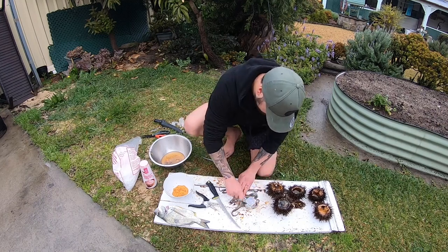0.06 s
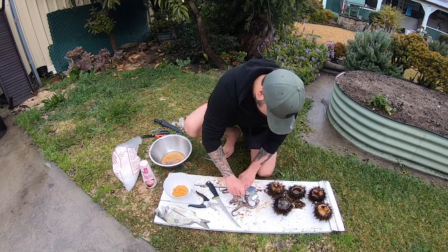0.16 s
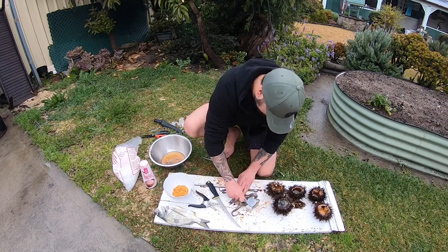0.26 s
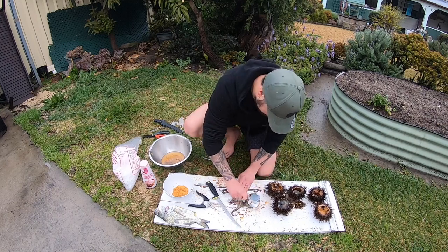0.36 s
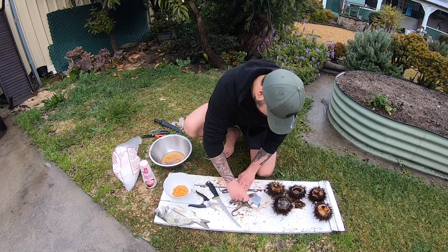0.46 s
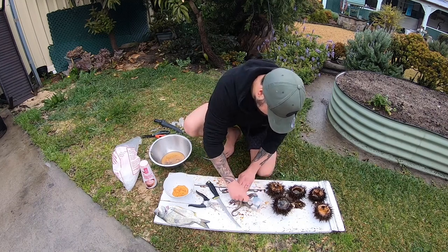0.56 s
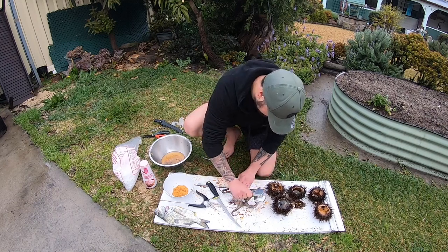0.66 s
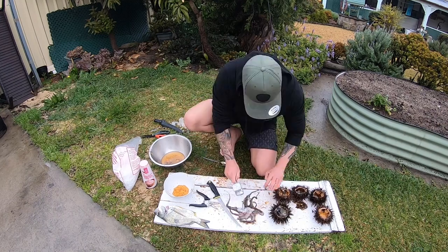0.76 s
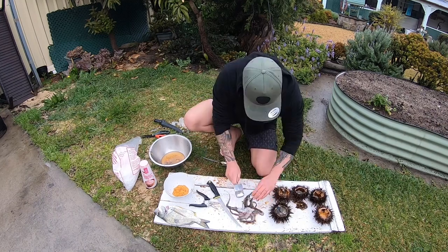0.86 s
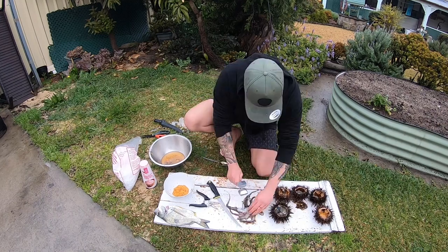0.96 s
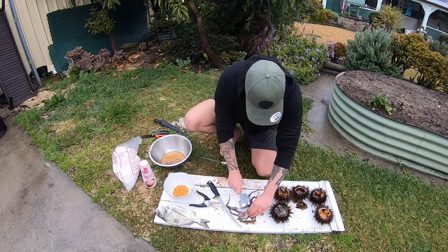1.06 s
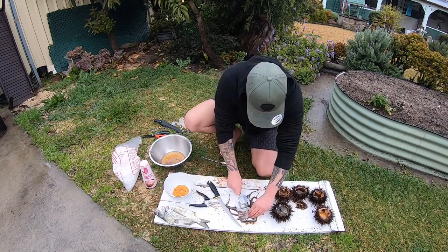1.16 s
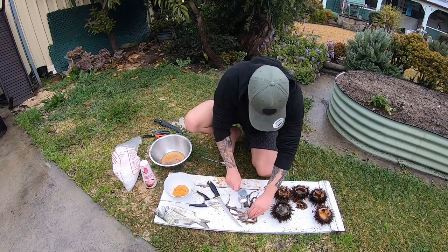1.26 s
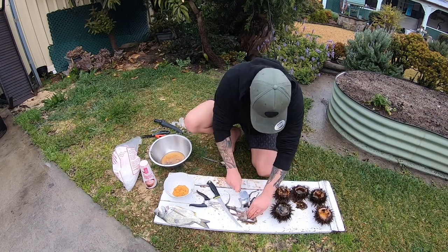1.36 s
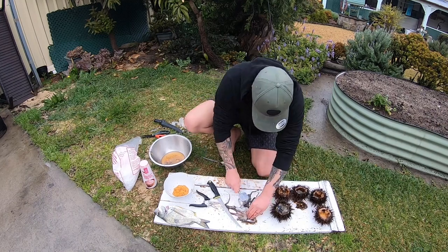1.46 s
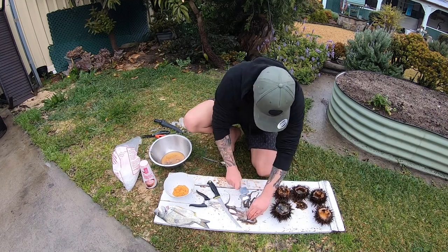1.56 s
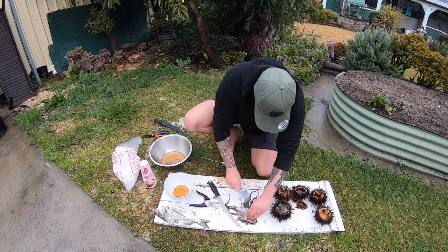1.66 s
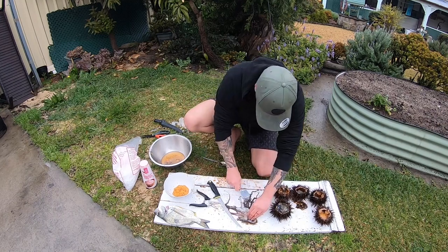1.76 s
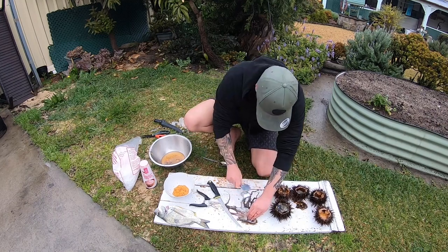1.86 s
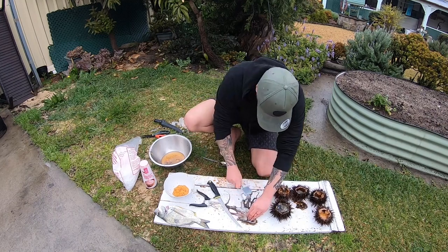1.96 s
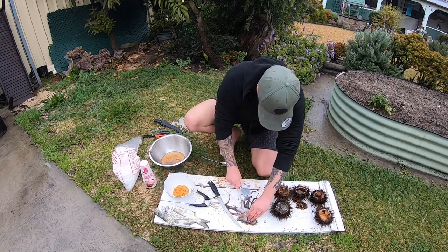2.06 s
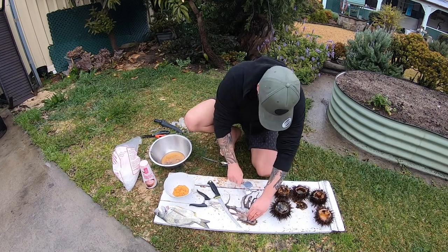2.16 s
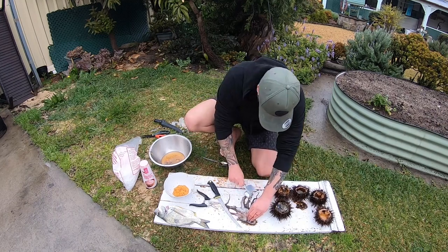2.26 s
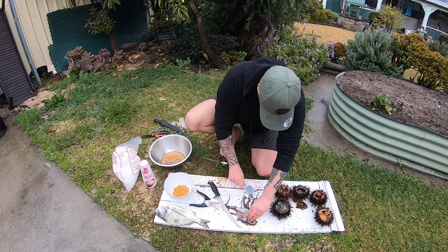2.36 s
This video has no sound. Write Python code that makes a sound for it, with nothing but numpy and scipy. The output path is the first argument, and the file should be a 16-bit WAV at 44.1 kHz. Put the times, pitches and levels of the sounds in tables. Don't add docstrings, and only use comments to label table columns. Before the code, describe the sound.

Seven heavy wet whacks on octopus over a rattling board on grass, faint traffic behind

```python
import sys
import numpy as np
from scipy import signal
from scipy.fft import rfft, irfft
from scipy.io import wavfile
from scipy.ndimage import uniform_filter1d

SR = 44100
rng = np.random.default_rng(int(sys.argv[2]) if len(sys.argv) > 2 else 0)


def to_wav(s):
    ch = np.atleast_2d(s).T
    pcm = np.round(np.clip(ch, -1, 1) * 32767)
    wavfile.write(sys.argv[1], SR, pcm.astype(np.int16))


def decibels_to_gain(level_db):
    exponent = np.asarray(level_db, float) / 20
    return 10 ** exponent


N = 105840

# start_s, level_db, pitch_hz, pitch_fall_per_s
BLOWS = [
    (0.1256, -3, 344, 40.6),
    (0.3736, -3.5, 370, 61.7),
    (0.617, -4.5, 373, 110),
    (1.2159, -7.5, 302, 120),
    (1.5215, -4, 331, 69),
    (1.8121, -3.5, 371, 40),
    (2.1143, -4.5, 551, 509),
]
# start_s, level_db, pitch_hz, sharpness_db
REBOUNDS = [(.128, -11, 432, -10.5), (0.135, -19.5, 568, 11), (0.141, -10.5, 324, -3.5),
            (0.383, -14.5, 430, 5.5), (.394, -16.5, 406, -7), (0.619, -15, 414, 4), (.627, -14, 404, 2),
            (0.636, -19.5, 400, -7.5), (1.211, -49, 700, 0), (1.218, -7, 763, -21), (1.222, -12, 392, 3),
            (1.227, -10, 353, -18.5), (1.524, -16, 324, 6), (1.5305, -15, 500, 9), (1.539, -16.5, 308, 0),
            (1.814, -15, 442, 1.5), (1.821, -8.5, 406, 0.5), (1.833, -20, 354, -6), (2.1192, -22, 432, 9),
            (2.1246, -9.5, 367, -21), (2.136, -21, 384, -4)]
# start_s, level_db, pitch_hz, sharpness_db
RATTLES = [(0.113, -31, 400, -17), (.170, -25, 507, 8), (0.213, -25, 390, -2), (0.4201, -24, 593, -1.5),
           (.6655, -25.5, 595, 0), (0.673, -24.5, 580, -11), (0.721, -26.5, 610, -15), (0.8, -28, 404, -20),
           (0.818, -26.5, 374, 1), (0.8466, -26.5, 343, -24), (0.989, -33.5, 345, -5.5),
           (1.259, -20.5, 362, -14), (1.264, -22.5, 447, -10), (1.282, -21, 370, -29),
           (1.31, -23.5, 397, -21), (1.555, -29, 400, -14), (1.584, -24, 400, -14), (1.860, -24, 390, -7),
           (1.878, -23.5, 442, -3.5), (1.907, -19.5, 450, -2.5), (2.1015, -23, 755, -16),
           (2.158, -25, 450, -5), (2.384, -34, 750, -31), (2.396, -23.5, 725, -28), (.2, -26, 500, 0.5),
           (.429, -31, 600, -5), (.449, -26.5, 361, -13), (.474, -30.5, 415, -3), (.579, -42, 225, -18),
           (.727, -29, 590, -8), (.807, -33.5, 334, -12), (1.24, -22, 398, -3), (1.297, -23.5, 354, -14),
           (1.51, -34, 400, -17), (1.567, -27.5, 517, 0), (1.603, -28, 450, -6), (1.628, -32, 363, -16),
           (1.798, -30, 500, -12.5), (1.93, -31, 342, -15), (2.204, -38, 447, -9), (2.256, -34.5, 400, -10)]
# pitch_hz, level_db, t60_s
BOARD_MODES = [(210, -13.5, 0.09), (799, -8, 0.039), (1134, -11, 0.02), (1406, -7.5, 0.017),
               (1843, -16.5, 0.031), (2210, -16.5, 0.01), (2810, -7, 0.0052), (3660, -22, 0.021)]
# start_s, level_db
BOWL_HITS = [
    (.374, -48.5),
    (.617, -44.5),
    (1.216, -60),
    (1.812, -41.5),
    (2.114, -64),
]
# start_s, level_db, pitch_hz, t60_s
CLINKS = [(0.1253, -22.5, 2570, 0.022), (0.136, -20, 1630, 0.022), (.372, -35, 4220, 0.022),
          (0.376, -35.5, 2420, 0.013), (0.385, -27, 1620, 0.026), (0.4203, -25.5, 1590, 0.028),
          (0.6663, -33, 1160, 0.026), (1.2105, -28.5, 2145, 0.037), (1.213, -31.5, 3260, .02),
          (1.222, -28, 2600, 0.013), (1.288, -46, 3360, .03), (1.5176, -22.5, 2090, 0.023),
          (1.527, -31, 3010, .04), (1.529, -19, 1545, 0.015), (1.822, -18.5, 1480, 0.028),
          (1.882, -38.5, 3350, 0.016), (1.882, -47.5, 5300, 0.017), (.6145, -34, 6200, 0.015),
          (.6142, -13.5, 804, 0.058)]
# pitch_hz, slap_db, tail_db, tail_t60_s
SLAP_BANDS = [(700, -27.5, -32.5, 0.32), (1280, -36, -40.5, 0.32), (2410, -34.5, -46, 0.31),
              (3650, -42, -64, 0.17), (6320, -46.5, -57, 0.35), (8300, -64.5, -58.5, 0.13),
              (10500, -65, -82, .2), (12200, -57.5, -75, .2), (14000, -55, -74, .2)]
# start_s, level_db, brightness_db_per_octave
TAPS = [(0.1208, 0.5, 0), (0.3701, -0.5, 0.5), (0.6133, -3.5, 0), (1.209, 0, 1.5), (1.5164, -0.5, 2),
        (1.8075, -7, 2), (2.1104, -4, 1), (0.135, -21, -4), (0.419, -24, -3), (0.7976, -18, 0.5),
        (0.808, -33, 4.5), (0.8565, -27, 4), (1.219, -13, -1), (1.287, -29.5, 4), (1.526, -10.5, 0),
        (1.8112, -2, -1), (1.8816, -25, 1.5), (2.398, -24, 6), (.17, -37, -6), (.666, -38, -1.5),
        (1.552, -36, 13.5), (1.568, -30, -5), (2.117, -15, 2.5), (.97, -49, 8)]
# pitch_hz, level_db_per_hz
TRAFFIC_COLOUR = [(35, -15), (60, 3.5), (150, 2), (400, -4.5), (1000, -4.5), (1700, -13.5), (3500, -27.5),
                  (4400, -54), (9000, -36), (11000, -67.5)]
# start_s, level_db
TRAFFIC_SWELL = [(0, -47), (.5, -49.5), (1, -46.5), (1.5, -46.5), (2, -48), (2.4, -49.5)]
# pitch_hz, likeness_0_to_1
LIKENESS = [(60, 0.9), (120, 0.9), (250, 1), (520, 0.54), (1080, 0.29), (2220, 0.13), (4560, 0.52),
            (9390, 0.15)]
# start_s, level_db
ENGINE_LEVEL = [(0, -52), (.4, -49.5), (.62, -62), (.8, -57), (1, -65), (1.1, -63.5), (2.4, -89)]
# start_s, level_db
TYRE_LEVEL = [(.7, -71), (.9, -50.5), (1.2, -53.5), (1.35, -58), (1.5, -56.5), (1.9, -65), (2.4, -64)]
# start_s, level_db
WIND_GUSTS = [(0, -45), (.08, -40), (.14, -37), (0.221, -33), (0.299, -55.5), (.45, -54), (.58, -39),
              (.68, -56.5), (.93, -65.5), (.985, -40.5), (1.079, -56), (1.301, -52), (1.42, -77),
              (1.6, -56.5), (1.85, -55.5), (2.4, -61)]
# start_s, length_s, level_db, start_hz, end_hz
BIRD_NOTES = [(0.053, 0.1, -77, 6700, 6600), (0.862, 0.055, -73, 6750, 6560), (1.016, .05, -76, 6650, 6650),
              (1.162, 0.055, -78, 6700, 6600), (1.329, 0.057, -73, 6700, 6600),
              (1.94, .08, -79, 6700, 6600), (.33, 0.022, -74, 6700, 6600), (1.62, 0.075, -77, 6700, 6600),
              (2.008, 0.077, -65.5, 3540, 3650), (2.247, 0.068, -66, 3050, 2940),
              (2.3, 0.027, -64.5, 2840, 2610), (0.97, 0.044, -66, 2700, 2660),
              (1.632, 0.043, -65.5, 3500, 3480)]
# pitch_hz, left_minus_right_db
PORT_LEAN = [(40, 11.5), (70, 0.7), (110, -0.3), (180, -0.5), (320, -0.6), (570, -2), (990, -4.5),
             (1740, -1.5), (3050, -1.5), (5360, -2), (8000, -0.1), (12000, -2.2)]
# pitch_hz, lead_radians
PORT_LEAD = [(4500, 0.085), (6500, -1.3), (7500, -1.97), (12000, -2)]

SWELL_CYCLES, DIE_S, LEAD_CYCLES = 0.75, 0.0019, 1.24
BOOM_HZ, BOOM_DB, BOOM_S, EDGE_HZ = 168.7, -13, 0.0043, 450
KNOCK_CYCLES, PUSH_S, CHATTER_S = 12.8, 0.00044, 0.0025
BOARD_LOW_HZ, MODE_SCATTER_DB = 75, 2
SHUDDER_DB, SHUDDER_T60_S, SHUDDER_PER_S, SHUDDER_SPREAD_DB = -21, 0.33, 820, 0.5
BOWL_HZ, BOWL_T60_S = 847, 0.99
SLAP_T60_S, SLAP_RISE_CYCLES, TICK_DB, TICK_T60_S = 0.078, 2.1, -3, 0.015
ENGINE_HZ, ENGINE_WIDTH_OCTAVES = 145.8, 0.12
WIND_HZ, WIND_LEFT_DB = 45, -7
MIC_TOP_HZ = 9470
OPPOSITE = np.array([[1], [-1]])


def unit(x):
    return x / np.sqrt(np.mean(x ** 2))


def read(table, hz):
    table = np.array(table, float)
    return np.interp(np.log(hz), np.log(table[:, 0]), table[:, 1])


def level_over_time(table):
    return decibels_to_gain(np.interp(np.arange(N) / SR, *np.array(table).T))


def band(x, hz, width):
    edges = [hz * 2 ** (-width / 2), min(hz * 2 ** (width / 2), SR / 2.2)]
    return signal.sosfilt(signal.butter(2, edges, "bandpass", fs=SR, output="sos"), x)


def add(out, s, x):
    i = int(s * SR)
    out[..., i:i + x.shape[-1]] += x[..., :N - i]


def fade(t, t60):
    return np.exp(-np.log(1000) * np.maximum(t, 0) / t60) * (t >= 0)


def walk(rate):
    k = int(SR / rate)
    steps = np.repeat(rng.standard_normal(N // k + 1), k)
    return 1.3 * uniform_filter1d(uniform_filter1d(steps, k), k)[:N]


def thump(db, hz, fall):
    t = np.arange(-.01 * SR, .03 * SR) / SR
    spread = np.where(t < 0, SWELL_CYCLES / hz, DIE_S)
    start = np.clip((t * hz + LEAD_CYCLES) / 0.42, 0, 1)
    shape = np.exp(-(t / spread) ** 2 / 2) * start
    wave = shape * np.cos(2 * np.pi * hz * (1 - np.exp(-fall * t)) / fall)
    boom_shape = np.exp(-((t - .002) / BOOM_S) ** 2 / 2)
    boom = decibels_to_gain(BOOM_DB) * boom_shape * np.cos(2 * np.pi * BOOM_HZ * t)
    direction = -1 if hz > EDGE_HZ else 1
    return decibels_to_gain(db) * (wave + boom) * direction


def knock(db, hz, sharp_db):
    t = np.arange(.12 * SR) / SR
    chance = rng.standard_normal((len(BOARD_MODES), 3))
    upper = 0
    for (f, mode_db, t60), (loud, detune, sign) in zip(BOARD_MODES, chance):
        gain = np.sign(sign) * decibels_to_gain(mode_db + sharp_db + MODE_SCATTER_DB * loud)
        upper = upper + gain * np.sin(2 * np.pi * f * (1 + 0.041 * detune) * t) * fade(t, t60)
    chatter = rng.standard_normal(1024) ** 3
    chatter = chatter * np.exp(-np.arange(len(chatter)) / SR / CHATTER_S)
    chatter = chatter / np.sqrt(np.sum(chatter ** 2))
    upper = signal.fftconvolve(upper, chatter)[:len(t)] * decibels_to_gain(-1.5)
    low = np.sin(2 * np.pi * hz * t) * fade(t, KNOCK_CYCLES / hz) * (1 - np.exp(-t * hz / 0.15))
    push = np.hanning(int(PUSH_S * SR) + 2)
    return decibels_to_gain(db) * np.convolve(low + upper, push / push.sum())


def shudder():
    out, t = np.zeros(N), np.arange(N) / SR
    after_blows = sum(fade(t - s, SHUDDER_T60_S) for s, *_ in BLOWS)
    for hz in (300, 400, 520):
        ticks = (rng.random(N) < SHUDDER_PER_S / SR) * rng.standard_normal(N)
        ticks = ticks * decibels_to_gain(SHUDDER_SPREAD_DB * walk(46)) * after_blows
        out += signal.fftconvolve(ticks, knock(SHUDDER_DB - 12.5, hz, -7.5))[:N]
    return out


def steel_bowl():
    t = np.arange(N) / SR
    return sum(decibels_to_gain(db) * fade(t - s, BOWL_T60_S) * np.sin(2 * np.pi * BOWL_HZ * (t - s))
               for s, db in BOWL_HITS)


def board():
    out = shudder() + steel_bowl()
    for s, db, hz, fall in BLOWS:
        add(out, s - .01, thump(db, hz, fall))
    for s, db, hz, sharp_db in REBOUNDS + RATTLES:
        add(out, s, knock(db, hz, sharp_db))
    return signal.sosfilt(signal.butter(2, BOARD_LOW_HZ, "highpass", fs=SR, output="sos"), out)


def slap():
    out, t = np.zeros((2, N)), np.arange(N) / SR
    grit = decibels_to_gain(3 * walk(400))
    for hz, slap_db, tail_db, t60 in SLAP_BANDS:
        octaves = np.log2(hz / 2500)
        rise_t60 = SLAP_RISE_CYCLES * np.log(1000) / hz
        tick_gain = decibels_to_gain(TICK_DB + 1.6 * octaves)
        smack, tail = np.zeros(N), np.zeros(N)
        for s, db, tilt in TAPS:
            since = t - s
            loud_db = db + tilt * octaves
            fall = fade(since, SLAP_T60_S) + tick_gain * fade(since, TICK_T60_S)
            smack += decibels_to_gain(loud_db + slap_db) * (1 - fade(since, rise_t60)) * fall
            tail += decibels_to_gain(loud_db + tail_db) * fade(since, t60)
        tail *= decibels_to_gain(walk(60))
        near, far, side = rng.standard_normal((3, N))
        side = side * OPPOSITE
        hiss = smack * grit * (near + 0.28 * side) + tail * (far + 0.64 * side)
        out += band(hiss, hz, .9 if hz < 7000 else .4) / np.sqrt(hz / SR)
    return out


def clinks():
    out, t = np.zeros(N), np.arange(.05 * SR) / SR
    for s, db, hz, t60 in CLINKS:
        spacing, phase = rng.random(2)
        partner_hz = hz * (1.07 + 0.18 * spacing)
        pair = np.sin(2 * np.pi * hz * t) + 0.39 * np.sin(2 * np.pi * (partner_hz * t + phase))
        add(out, s, decibels_to_gain(db) * pair * fade(t, t60) * (1 - np.exp(-t * hz / 1.2)))
    return out


def traffic():
    out, drift = 0, walk(0.83)
    for hz in 40 * 2 ** np.arange(0, 8.6, .5):
        mid, side = band(rng.standard_normal((2, N)), hz, 0.48)
        alike = np.clip(np.sqrt(read(LIKENESS, hz)), 0, 1)
        db = read(TRAFFIC_COLOUR, hz) + .7 * drift + 0.68 * walk(22.0)
        out = out + decibels_to_gain(db) * (np.sqrt(1 + alike) * mid + np.sqrt(1 - alike) * side * OPPOSITE)
    return unit(out) * level_over_time(TRAFFIC_SWELL)


def far_engine():
    return unit(band(rng.standard_normal(N), ENGINE_HZ, ENGINE_WIDTH_OCTAVES)) * level_over_time(ENGINE_LEVEL)


def tyres():
    return unit(band(rng.standard_normal((2, N)), 1107, 0.26)) * level_over_time(TYRE_LEVEL)


def wind():
    buffeting = unit(band(rng.standard_normal((2, N)), WIND_HZ, 1.2))
    return buffeting * level_over_time(WIND_GUSTS) * decibels_to_gain([[WIND_LEFT_DB], [0]])


def birds():
    out = np.zeros(N)
    for s, length, db, hz, end_hz in BIRD_NOTES:
        n = int(length * SR)
        tremble = 1 + band(rng.standard_normal(8192), 130, 1.4)[:n] * 7
        cycles = np.cumsum(np.linspace(hz, end_hz, n)) / SR
        add(out, s, decibels_to_gain(db) * np.hanning(n) ** .5 * tremble * np.sin(2 * np.pi * cycles))
    return out


def scene():
    return board() + slap() + clinks() + traffic() + far_engine() + tyres() + wind() + birds()


def band_limit(x):
    return signal.sosfilt(signal.butter(12, 15500, fs=SR, output="sos"), x)


def record(dry):
    hz = np.arange(N // 2 + 1) * SR / N + 1e-3
    half = decibels_to_gain(read(PORT_LEAN, hz) / 2) * np.exp(1j * read(PORT_LEAD, hz) / 2)
    dry = signal.sosfilt(signal.butter(4, MIC_TOP_HZ, fs=SR, output="sos"), dry)
    mix = irfft(rfft(dry) * np.array([half, 1 / half]), N)
    return band_limit(mix)


dry = scene()
out = record(dry)
to_wav(out)
```